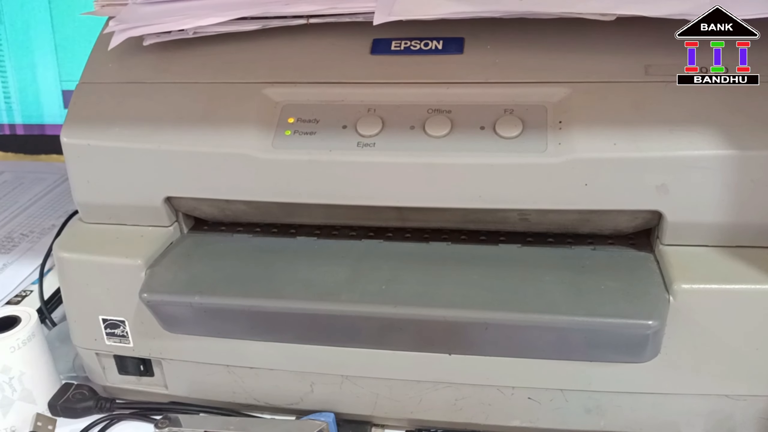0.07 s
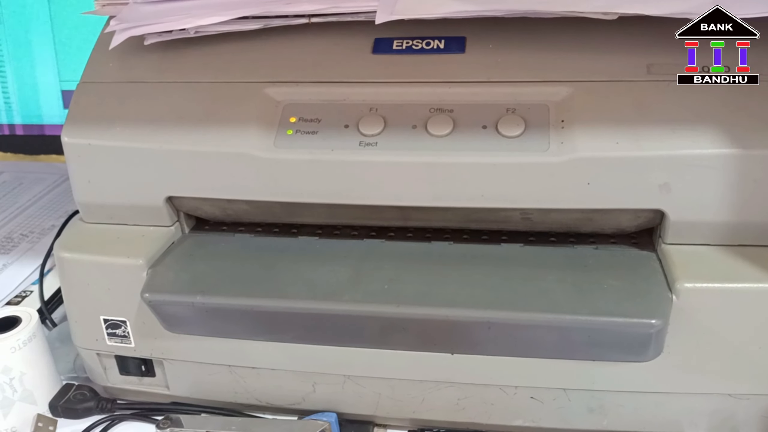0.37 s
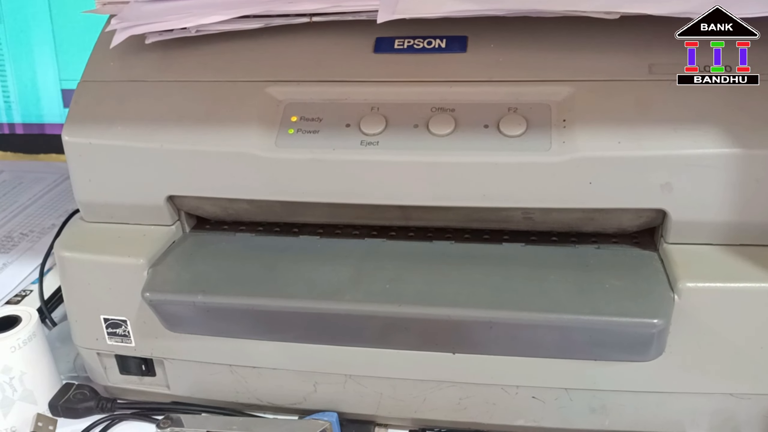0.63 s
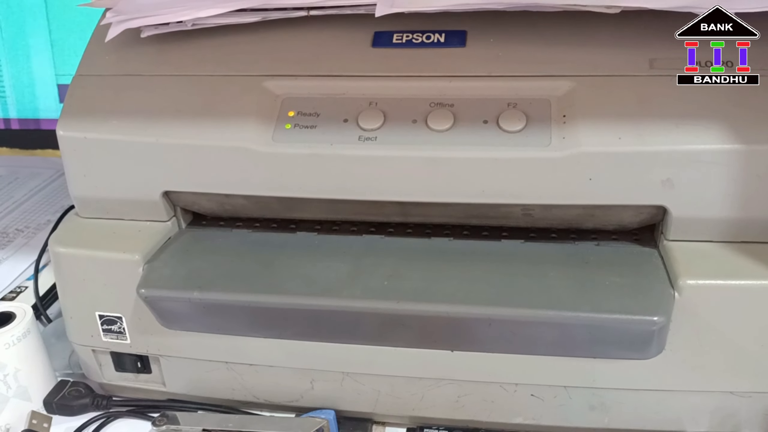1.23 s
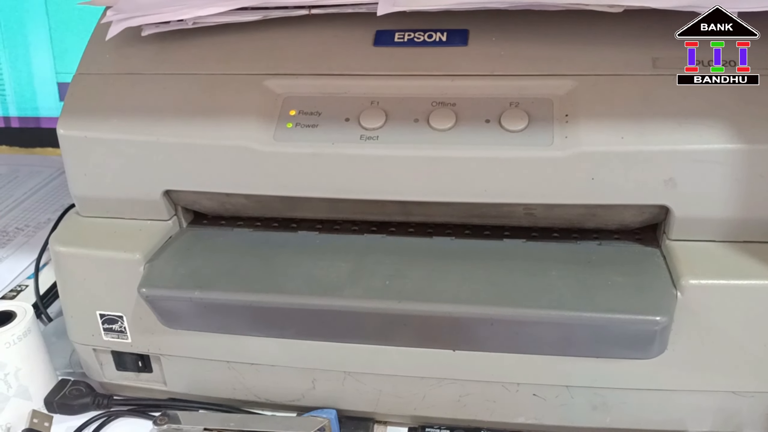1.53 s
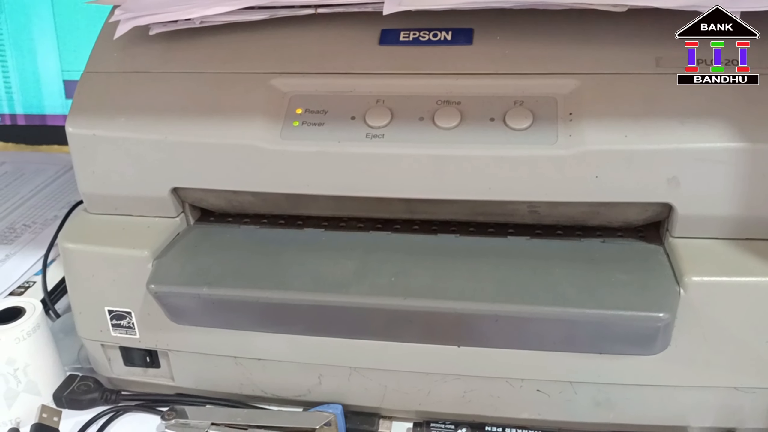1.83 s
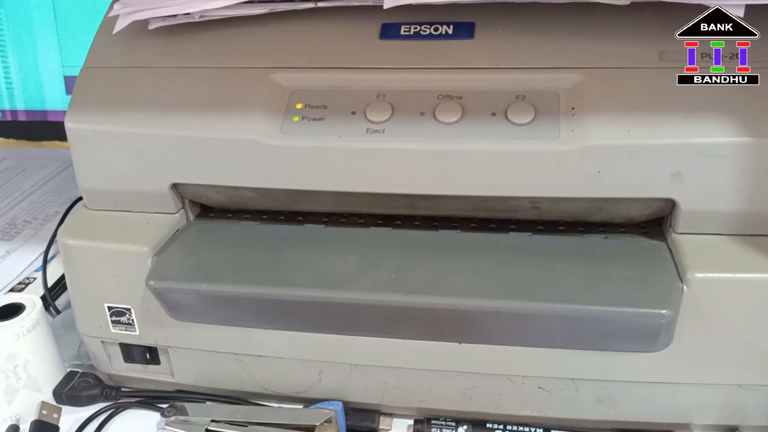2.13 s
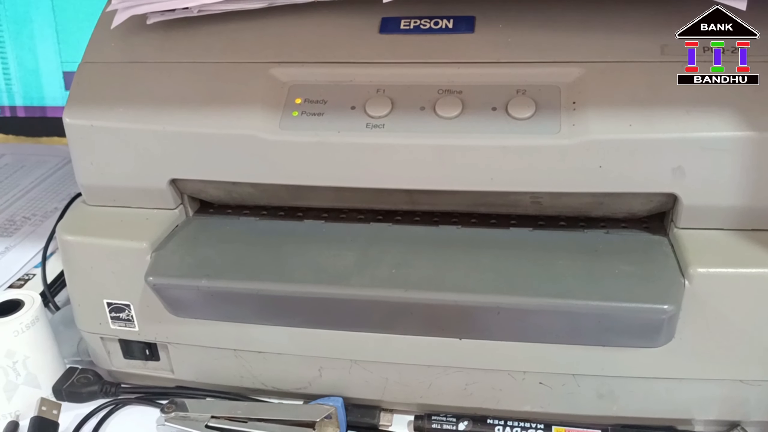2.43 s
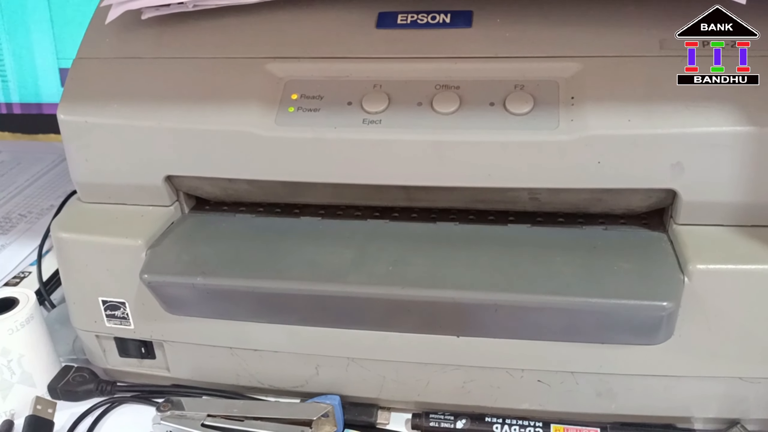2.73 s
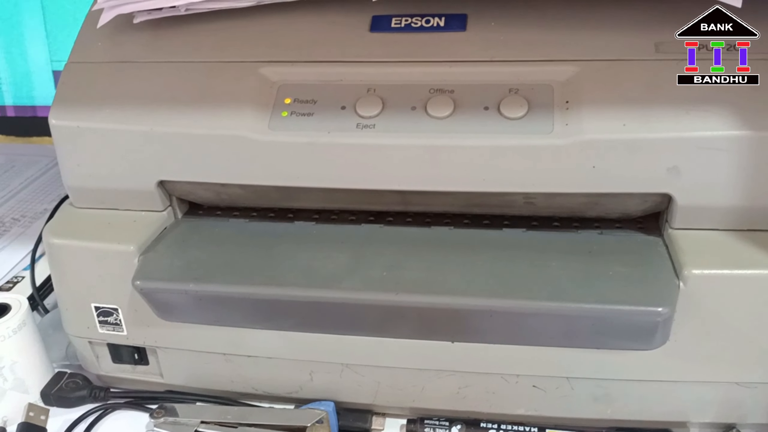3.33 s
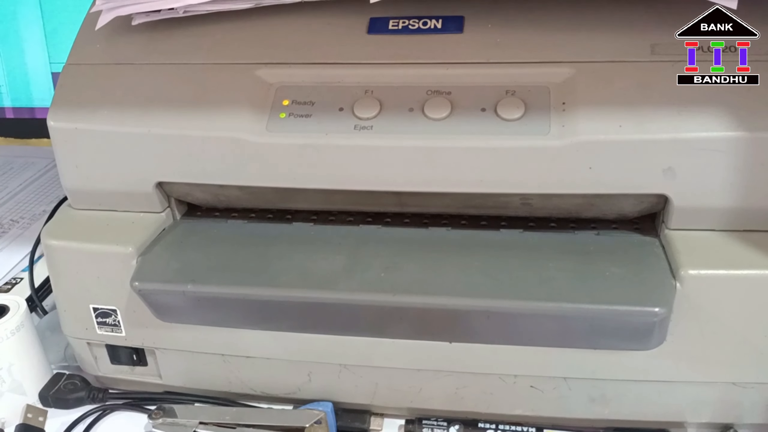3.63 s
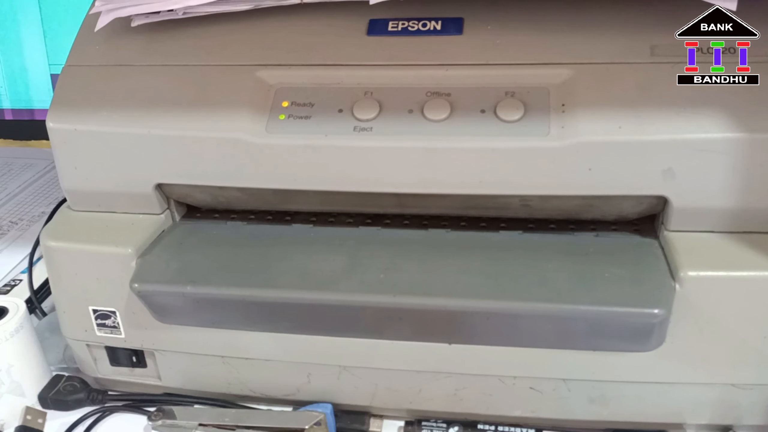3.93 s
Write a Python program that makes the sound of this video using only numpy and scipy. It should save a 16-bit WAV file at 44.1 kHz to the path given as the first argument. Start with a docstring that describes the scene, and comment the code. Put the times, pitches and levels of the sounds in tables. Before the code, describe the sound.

A dot matrix printer runs close by in a small room, its carriage rumbling and whining throughout. The paper feed rattles and thuds at about 0.4 seconds. A harsh, dense printing buzz lasts from 0.8 to 1.4 seconds. The whine grows, and the feed rattles again near 2.1. A stuttering print pass runs from 2.9 to 3.3, followed by a faint paper hiss, rattle and thud around 3.8.

```python
"""A dot matrix printer at work

Close by in a small room, the printer finishes one line and prints two more. Pins hammer the
paper on a fixed grid of dots, while the carriage that carries them rumbles along its rail and
its motor whines. Between lines the carriage brakes, the paper feed rattles the sheet onward,
and some restarts shake the case."""
import sys
import numpy as np
from scipy import signal
from scipy.fft import rfft, irfft
from scipy.io import wavfile
from scipy.ndimage import uniform_filter1d

SR = 44100
rng = np.random.default_rng(int(sys.argv[2]) if len(sys.argv) > 2 else 0)


def generate_wav(sig):
    """Save sig (samples, or channels by samples) to the path in sys.argv[1] as 16-bit PCM at SR."""
    pcm = np.round(np.clip(np.atleast_2d(sig).T, -1, 1) * 32767).astype(np.int16)
    wavfile.write(sys.argv[1], SR, pcm)


N = 176400
T = np.arange(N) / SR
HZ = np.fft.rfftfreq(N, 1 / SR)
DOT_HZ = 1080.7  # dot positions passed each second

# One loudness curve for each densely printed line. Each row: time in seconds, level in dB.
DENSE_LINES = [
    [(0, -37), (.07, -52.5)],
    [(.836, -33), (.93, -33), (1.02, -32.5), (1.1, -32), (1.185, -31), (1.2, -37), (1.235, -30.5),
     (1.25, -38.5), (1.285, -31), (1.325, -31.5), (1.357, -33)],
]
# The loudness of a line of spaced characters. Each row: time in seconds, level in dB.
SPACED_LINE = [(2.937, -30.5), (3.07, -29.5), (3.16, -30.5), (3.24, -32), (3.342, -33)]
# The tone colour of the pin strikes. Each row: frequency in Hz, level in dB.
HEAD_COLOUR = [(100, -46), (200, -9), (500, 1.5), (800, -4.5), (1100, -1), (1550, -8), (2100, 0.5),
               (2700, 0.5), (3250, -1), (3850, -0.5), (5500, -0.5), (11800, -2), (14300, -5),
               (15500, -17.5)]
# Where the strikes are heard. Each row: frequency in Hz, left minus right in dB.
HEAD_PAN = [(200, 2), (1200, 3), (3300, -2.5), (5400, -0.5), (6500, -5.5), (9000, -2), (12000, 2),
            (15000, -6)]
# How the head rings. Each row: pitch in Hz, width in Hz, level in dB, left minus right in dB.
HEAD_RINGS = [(162, 35, -19.5, -3), (504, 110, -22.5, -7), (1120, 130, -22, 15), (3220, 270, -19.5, 2.5),
              (6200, 180, -32, 4), (8760, 120, -13.5, -15), (13000, 230, -15, 4)]


def print_head(pins=16, cell_dots=6, stroke_dots=1.9, ink_chance=.4, repeat_chance=.55,
               wander_s=.000012, swell_db=5, char_hz=28.6, char_middle_s=2.947, gap_db=-17):
    """Pins strike in turn, in short runs of dots, often repeating a small group of dots (a cell)."""
    dots = np.arange(int(N / SR * DOT_HZ) - 1)
    cell, column = np.divmod(dots, cell_dots)
    wander = wander_s * unit(uniform_filter1d(rng.standard_normal(len(dots)), cell_dots))
    strikes = np.zeros((2, N))
    for pin in range(pins):
        change, ink, fresh = rng.random((3, len(dots)))
        stroke_start = np.maximum.accumulate(dots * (change < 1 / stroke_dots))
        inked = ink[stroke_start] < ink_chance
        last_fresh_cell = np.maximum.accumulate(cell * (fresh[cell] > repeat_chance))
        fires = inked[last_fresh_cell * cell_dots + column]
        times = (dots + pin / pins) / DOT_HZ + wander
        clicks = np.zeros(N)
        clicks[np.clip(np.round(times * SR).astype(int), 0, N - 1)] = fires - ink_chance / 2
        strikes += clack(clicks) * amp(swell_db * drift(14))  # pins share the work unevenly
    strikes /= np.sqrt(uniform_filter1d(np.mean(strikes ** 2, 0), size=1500))  # even out the level
    sound = shaped(strikes, amp(read(HEAD_COLOUR, HZ)) * pan(read(HEAD_PAN, HZ)))
    for hz, width, db, side_db in HEAD_RINGS:
        sound += amp(db) * pan(side_db) * ring(strikes, hz, width)
    # On the spaced line, the level dips between one character and the next.
    gaps = np.sin(np.pi * char_hz * (T - char_middle_s)) ** 2
    characters = amp(gap_db * (1 + .18 * drift(char_hz)) * gaps)
    force = sum(level(line) for line in DENSE_LINES) + level(SPACED_LINE) * characters
    return amp(-1) * sound * uniform_filter1d(force, size=110)


def clack(clicks, ring_s=.0011):
    """Each pin's click becomes a short burst of dense ringing."""
    t = np.arange(512) / SR
    burst = rng.standard_normal((2, len(t))) * np.exp(-t / ring_s)
    return signal.oaconvolve(clicks[None], unit(burst), axes=1)[:, :N]


# The tones of the pins' buzz. Each row: multiple of the dot rate, level in dB, left minus right in dB.
BUZZ_TONES = [(1, -37.5, 7), (6, -68, -14), (8, -49, -15)]
# How the buzz swells and fades. Each row: time in seconds, level in dB.
BUZZ_LEVEL = [(.835, -18), (.9, -12.5), (.97, -4.5), (1.04, -4.5), (1.15, 4.5), (1.185, -4), (1.21, -9),
              (1.35, -24), (1.38, -54)]


def pin_buzz(rough=.53):
    """Pins firing at every dot buzz at the dot rate and its multiples."""
    out = 0
    for k, db, side_db in BUZZ_TONES:
        buzz = tone(k * DOT_HZ * T, offset=.58) + rough * ring(noise(), k * DOT_HZ, 61)
        out += amp(db) * pan(side_db) * buzz
    return level(BUZZ_LEVEL) * out


# The feed's rattles. Each row: start in seconds, seconds until it fades, level in dB, treble in dB.
FEED_BURSTS = [(0.383, 0.047, -35.5, 0.5), (2.047, 0.045, -38.5, 3), (2.075, 0.033, -40.5, 0),
               (2.143, 0.0094, -38.5, -4), (3.728, 0.028, -37, 2), (3.762, .022, -35, -18),
               (3.808, 0.027, -39.5, -12)]
# The tone colour of the rattle. Each row: frequency in Hz, level in dB.
FEED_COLOUR = [(88, -21), (150, -3), (225, 1.5), (343, -14), (589, 2), (787, -13.5), (1160, -11),
               (1460, -16), (2360, -3), (2700, -9), (2920, -7), (4120, -18), (4460, -18.5), (5950, -24.5),
               (15000, -32)]
# The loudness of the sliding sheet. Each row: time in seconds, level in dB.
SLIDE_LEVEL = [(3.48, -61), (3.67, -46), (3.73, -53), (3.82, -51.5)]
# The tone colour of the sliding sheet. Each row: frequency in Hz, level in dB.
PAPER_COLOUR = [(500, -21), (3000, -1.5), (6500, 5.5), (9000, -3.5), (12000, 0), (15500, -12)]


def paper_feed(teeth_per_s=2100, spread_db=3, tooth_s=.002, rise_s=.0079, fall_s=.02, treble_hz=1300):
    """Gear teeth clatter in short bursts, and the sheet hisses as it slides on."""
    teeth = rng.random(N) < teeth_per_s / SR
    force = teeth * amp(spread_db * np.clip(rng.standard_normal(N), -2, 2))
    fading_power = signal.lfilter([1], [1, -np.exp(-2 / (tooth_s * SR))], force ** 2)
    rattle = shaped(noise() * np.sqrt(fading_power), amp(read(FEED_COLOUR, HZ)))
    low = signal.sosfilt(signal.butter(1, treble_hz, fs=SR, output="sos"), rattle)
    out = level(SLIDE_LEVEL) * shaped(noise(), amp(read(PAPER_COLOUR, HZ)))
    for start, length, db, treble_db in FEED_BURSTS:
        rise = np.clip((T - start) / rise_s, 0, 1)
        fall = np.exp(-np.maximum(T - start - length, 0) / fall_s)
        out += amp(db) * rise * fall * (low + amp(treble_db) * (rattle - low))
    return out


# The metallic strikes of the feed gear. Each row: time in seconds, level in dB.
GEAR_HITS = [(.404, -31), (.415, -31.5), (0.431, -30), (.484, -36.5), (.516, -38), (2.069, -38),
             (2.103, -37.5), (3.747, -29), (3.772, -35), (3.826, -39)]
# How the gear rings. Each row: pitch in Hz, level in dB, seconds to fade by 60 dB.
GEAR_RINGS = [(3050, -7, 0.16), (2845, -3.5, 0.064), (2440, -6, 0.058)]


def feed_gear(rise_s=.0018, rough=.27, rough_hz=70):
    """Each strike renews the gear's ring, which buzzes as it dies away."""
    out = 0
    for hz, db, fade_s in GEAR_RINGS:
        power = 0
        for start, hit_db in GEAR_HITS:
            rise = np.clip((T - start) / rise_s, 0, 1)
            power += (rise * amp(hit_db - 60 * abs(T - start) / fade_s)) ** 2
        out += amp(db) * np.sqrt(power) * tone(hz * T) * (1 + rough * ring(noise(), 0, rough_hz))
    return out


# The jolts that shake the case. Each row: time in seconds, level in dB.
CASE_JOLTS = [(.463, -22), (.508, -25.5), (3.852, -23), (3.9, -29.5)]
# How the case rings. Each row: pitch in Hz, level in dB, seconds to fade by 60 dB.
CASE_RINGS = [(142.8, -3.5, 0.13), (111.3, -22.5, 0.53)]


def case_jolts():
    """The restarting carriage shakes the case with a low thud."""
    return blows(CASE_JOLTS, CASE_RINGS, rise_s=.017)


# The knocks on the roller behind the paper. Each row: time in seconds, level in dB.
ROLLER_KNOCKS = [(.389, -37), (.553, -46), (1.192, -36), (1.226, -35), (1.352, -37), (2.051, -37.5),
                 (2.082, -37), (2.155, -45), (3.73, -39.5), (3.776, -42)]
# How the roller rings. Each row: pitch in Hz, level in dB, seconds to fade by 60 dB.
ROLLER_RINGS = [(368, -4.5, 0.1), (539, 1.5, 0.016), (721.5, -2, 0.088), (965, -5.5, 0.11)]


def roller_knocks():
    """The roller knocks under heavy print and as the feed starts or stops."""
    return blows(ROLLER_KNOCKS, ROLLER_RINGS, rise_s=.0057)


# When the carriage motor runs. Each row: start in seconds, stop in seconds.
MOTOR_RUNS = [(-.2, 0.41), (.465, 2.05), (2.152, 3.735), (3.851, 4.53)]
# The whine at the motor's step rate. Each row: time in seconds, level in dB.
WHINE_LEVEL = [(0, -54), (.2, -59), (.8, -58), (1.57, -62), (1.635, -47), (1.98, -50), (2.28, -47.5),
               (2.42, -48.5), (2.65, -41.5), (2.88, -48.5), (3.08, -44), (3.3, -41), (3.45, -49.5),
               (4, -46.5)]
# The tone an octave above the whine. Each row: time in seconds, level in dB.
OCTAVE_LEVEL = [(0, -53.5), (.8, -55.5), (1.7, -61), (2.3, -58), (4, -54.5)]
# The motor's strong overtones. Each row: multiple of the coils' cycle rate, level in dB.
STRONG_OVERTONES = [(15, -57.5), (24, -68.5), (31, -82), (33, -74), (47, -74), (48, -77), (49, -67.5),
                    (63, -70), (78, -73), (79, -67), (80, -77), (82, -62.5)]
# The weak overtones between those. Each row: frequency in Hz, level in dB.
WEAK_OVERTONES = [(3000, -68.5), (6000, -101), (7200, -102), (10000, -86.5), (12000, -74.5), (15000, -100)]
# Where the overtones are heard. Each row: frequency in Hz, left minus right in dB.
MOTOR_PAN = [(3000, -14), (8700, -9.5), (11500, 9), (14800, -8)]


def carriage_motor(cycle_hz=180.13, steps_per_cycle=16, ramp_s=.045, start_speed=.57,
                   waver=.00014, flutter_db=1.08, swell_db=2, rough=.072, ramp_rough=3.3):
    """A motor that moves in tiny steps whines as it runs, and rasps as it speeds up or brakes."""
    drive = sum(np.clip(np.minimum(T - start, stop - T) / ramp_s, 0, 1) for start, stop in MOTOR_RUNS)
    wobble = ring(noise(), 2.4, 12)[0]
    judder = .12 * (1 - drive) * ring(noise(), 0, cycle_hz)[0]
    speed = 1 - (1 - start_speed) * (1 - drive) ** 2
    cycles = np.cumsum(cycle_hz * speed * (1 + waver * wobble + judder)) / SR
    whine = level(WHINE_LEVEL) * pan(-.5) * tone(steps_per_cycle * cycles, offset=1.45)
    overtones = level(OCTAVE_LEVEL) * pan(-4) * tone(2 * steps_per_cycle * cycles)
    strong = dict(STRONG_OVERTONES)
    for k in range(12, 86):
        db = strong.get(k, read(WEAK_OVERTONES, k * cycle_hz)) + swell_db * drift(3)
        overtones += amp(db) * pan(read(MOTOR_PAN, k * cycle_hz)) * tone(k * cycles)
    rasp = 1 + (rough + ramp_rough * (1 - drive)) * ring(noise(), 0, cycle_hz)
    return amp(flutter_db * wobble) * rasp * (drive ** .84 * whine + drive ** 3 * overtones)


def drive_drone(hz=704, db=-53.5, waver_hz=4.9, flutter_db=3):
    """The drive drones on one slightly unsteady note."""
    cycles = np.cumsum(hz + waver_hz * drift(25)) / SR
    return amp(db + flutter_db * drift(25.07)) * pan(-4) * tone(cycles, offset=.14)


# The tone colour of the rumble. Each row: frequency in Hz, level in dB.
RUMBLE_COLOUR = [(15, -39), (33, -8.5), (65, -20.5), (95, -11), (150, 0.5), (200, 2), (260, 1), (380, -1.5),
                 (600, -4), (720, -3.5), (880, -10.5), (1800, -13), (2800, -9), (3500, -17.5),
                 (4900, -21.5), (5700, -17.5), (6700, -30), (8700, -24), (9800, -35.5), (12000, -25.5),
                 (14000, -27), (15500, -23)]
# Where the rumble is heard. Each row: frequency in Hz, left minus right in dB.
RUMBLE_PAN = [(200, 1), (700, -2), (1400, 5.5), (4500, 5.5), (9000, -2.5)]
# The hum of belt and rail. Each row: pitch in Hz, width in Hz, level in dB, left minus right in dB.
BELT_HUM = [(184, 18, -51, -2.5), (208, 8.9, -53, 0)]


def rail_rumble(rumble_db=-44, patchy_db=1.5):
    """Rail and belt give a patchy rumble with wavering hum tones."""
    bands = signal.stft(noise(), nperseg=512)[2]
    patches = uniform_filter1d(rng.standard_normal(bands.shape[1:]), size=12, axis=0)  # blur in pitch
    patches = unit(uniform_filter1d(patches, size=4, axis=1))  # blur in time
    patchy = signal.istft(bands * amp(patchy_db * patches), nperseg=512)[1][:, :N]
    rumble = shaped(patchy, amp(read(RUMBLE_COLOUR, HZ)) * pan(read(RUMBLE_PAN, HZ)))
    hum = sum(amp(db) * pan(side_db) * ring(noise(), hz, width) for hz, width, db, side_db in BELT_HUM)
    return amp(rumble_db) * rumble + hum


# How long the room echoes. Each row: frequency in Hz, seconds to fade by 60 dB.
ROOM_FADE = [(150, 0.18), (1000, 0.31), (4000, 0.49), (14000, 0.28)]


def room(x):
    """Scattered echoes come back from the room, each frequency dying at its own speed."""
    echoes = rng.standard_normal((2, SR // 2)) * (rng.random((2, SR // 2)) < .08)
    echoes[:, :128] = 0  # a short wait before the first echo
    hz, t, bands = signal.stft(echoes, SR, nperseg=256)
    tail = signal.istft(bands * amp(-60 * t / read(ROOM_FADE, hz)[:, None]), SR, nperseg=256)[1]
    return signal.fftconvolve(x, tail / np.linalg.norm(tail[0]), axes=1)[:, :N]


# How alike the two ears hear the sound. Each row: frequency in Hz, likeness (1 same, 0 unrelated).
EAR_LIKENESS = [(100, 0.96), (300, 0.96), (600, 0.69), (1200, -0.065), (2500, -0.38), (5000, -0.28),
                (15000, 0.038)]


def shaped(x, gain):
    """Colours a pair of signals; the bass is alike in both ears."""
    left, other = rfft(x)
    same = np.clip(read(EAR_LIKENESS, HZ), -1, 1)
    right = same * left + np.sqrt(1 - same ** 2) * other
    return unit(irfft(np.array([left, right]) * gain, N))


def ring(x, hz, width_hz):
    """Keeps a narrow band around one pitch, as a ringing object does."""
    return shaped(x, 1 / (1 + ((HZ - hz) / width_hz) ** 2))


def blows(hits, rings, rise_s):
    """Each blow swells into a few ringing tones, which then die away."""
    out = np.zeros(N)
    for start, hit_db in hits:
        t = np.maximum(T[:round((start + .5) * SR)] - start, 0)
        for hz, db, fade_s in rings:
            fall_db = 60 * np.maximum(t - rise_s, 0) / fade_s
            size = np.minimum(t / rise_s, 1) * amp(hit_db + db - fall_db)
            out[:len(t)] += size * np.sin(2 * np.pi * hz * t)
    return out


def tone(cycles, offset=np.pi / 2):
    """A pure tone whose wave is shifted between the ears by an offset in radians."""
    return np.sqrt(2) * np.cos(2 * np.pi * (cycles + rng.random()) + offset * np.array([[0], [1]]))


def drift(rate_hz):
    """A random swell of about size 1, made of six slow waves."""
    speed, phase = rng.random((2, 6))
    coarse = T[::256]
    waves = np.sin(2 * np.pi * (rate_hz * speed * coarse[:, None] + phase))
    return np.interp(T, coarse, waves.sum(1) / np.sqrt(3))


def noise():
    """Two unrelated channels of white noise."""
    return rng.standard_normal((2, N))


def amp(db):
    """Decibels to gain."""
    return 10 ** (np.asarray(db) / 20)


def unit(x):
    """Scales to an average power of 1."""
    return x / np.sqrt(np.mean(x ** 2) + 1e-20)


def read(points, hz):
    """Reads between a table's rows, on a log-frequency axis."""
    row_hz, value = np.transpose(points)
    return np.interp(np.log(hz + 1), np.log(row_hz + 1), value)


def level(points):
    """Gain along a dB curve, silent outside it."""
    return amp(np.interp(T, *np.transpose(points), left=-150, right=-150))


def pan(db):
    """Left and right gains; positive dB leans left."""
    gains = amp(np.array([[.5], [-.5]]) * db)
    return gains / np.sqrt(np.mean(gains ** 2, 0))


def scene(room_db=-5):
    """The printer and the room's answer to its sharp sounds."""
    sharp = print_head() + paper_feed()
    thuds = case_jolts() + roller_knocks()
    printing = sharp + amp(room_db) * room(sharp) + pin_buzz() + feed_gear() + thuds
    return printing + carriage_motor() + drive_drone() + rail_rumble()


def record(dry, cutoff_hz=15600):
    """Cuts off the very highest treble."""
    lowpass = signal.firwin(511, cutoff_hz, window=("kaiser", 9), fs=SR)
    return signal.oaconvolve(dry, lowpass[None], "same")


dry = scene()
out = record(dry)
generate_wav(out)
```